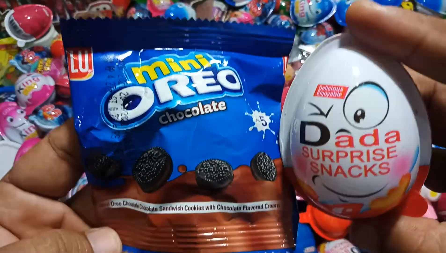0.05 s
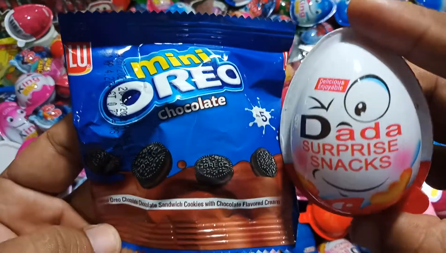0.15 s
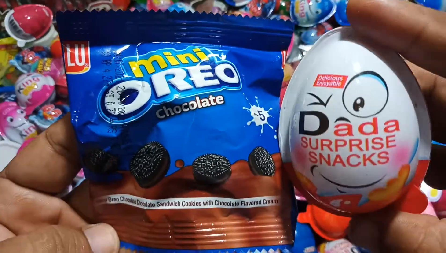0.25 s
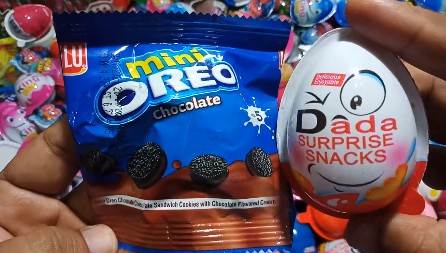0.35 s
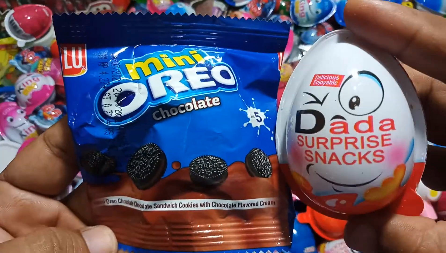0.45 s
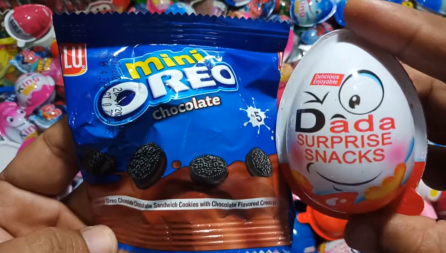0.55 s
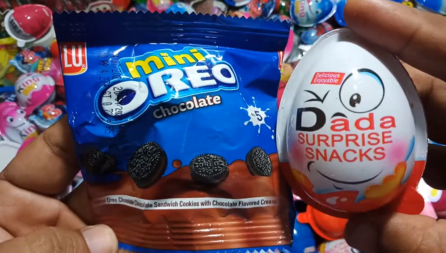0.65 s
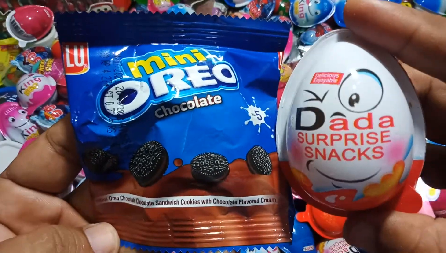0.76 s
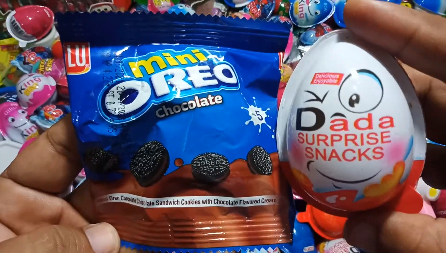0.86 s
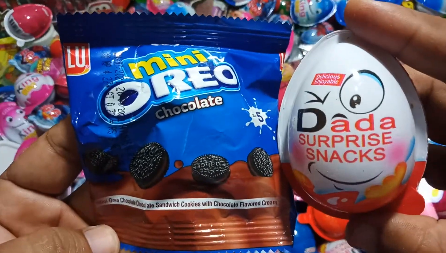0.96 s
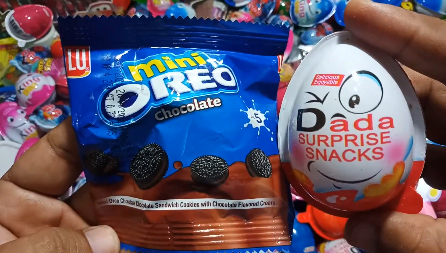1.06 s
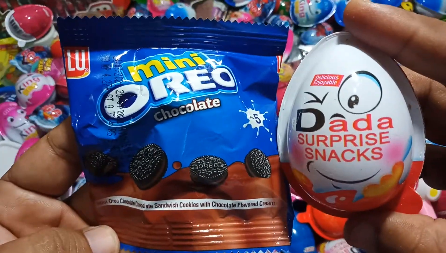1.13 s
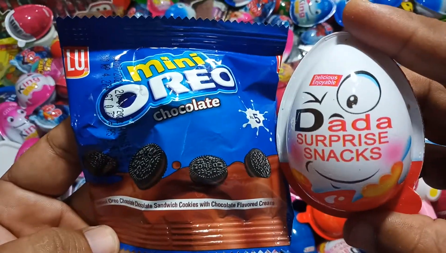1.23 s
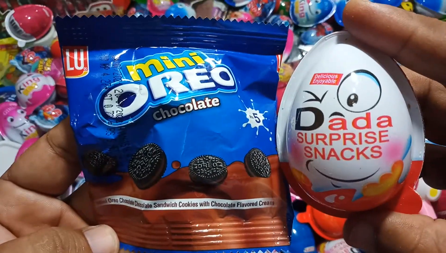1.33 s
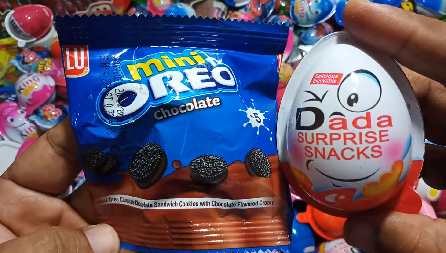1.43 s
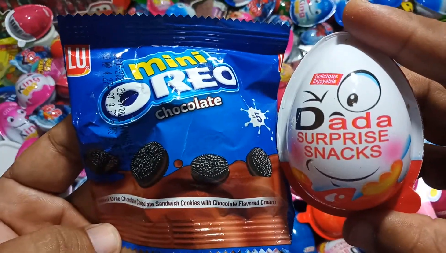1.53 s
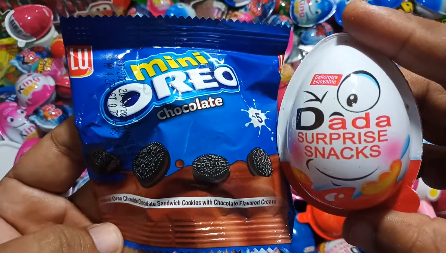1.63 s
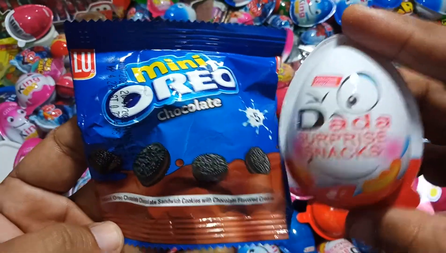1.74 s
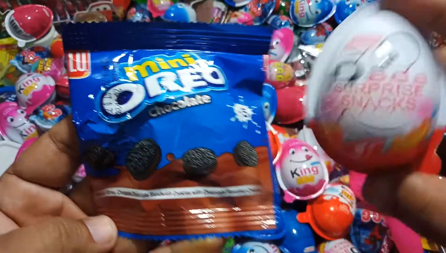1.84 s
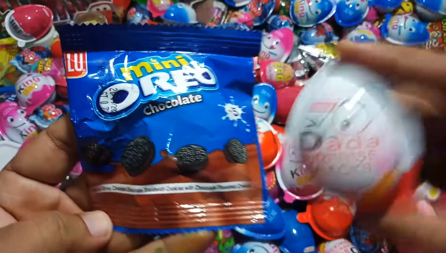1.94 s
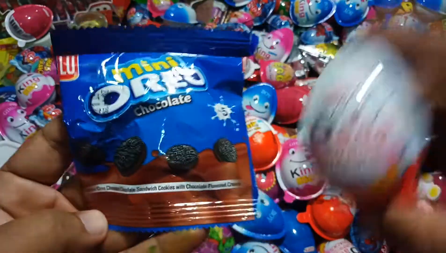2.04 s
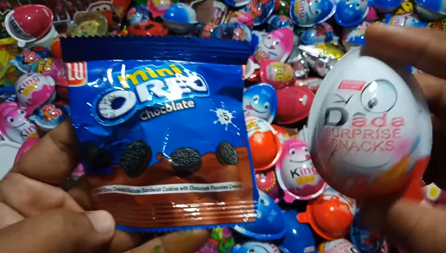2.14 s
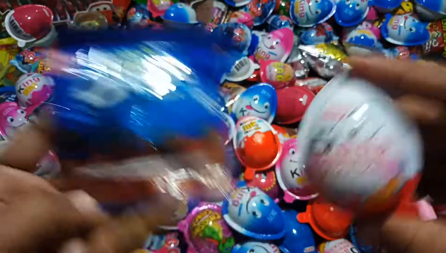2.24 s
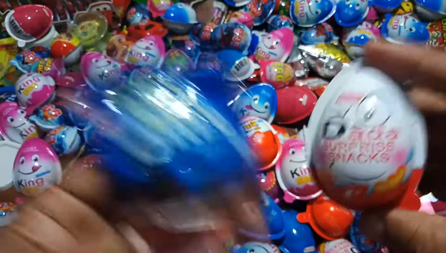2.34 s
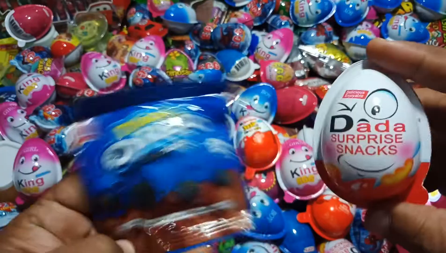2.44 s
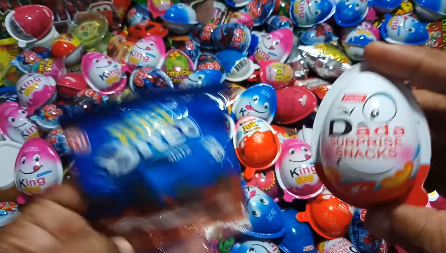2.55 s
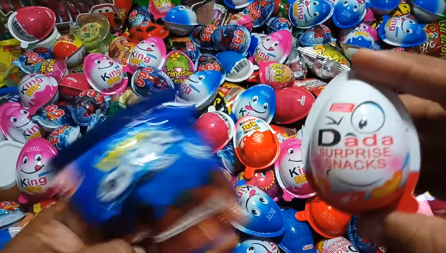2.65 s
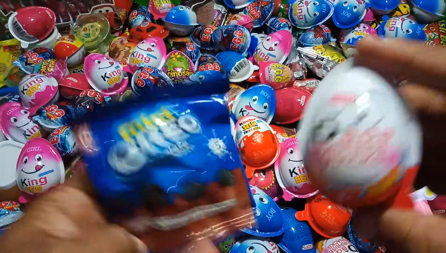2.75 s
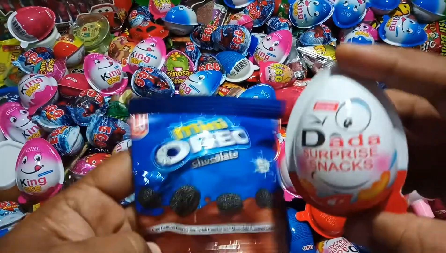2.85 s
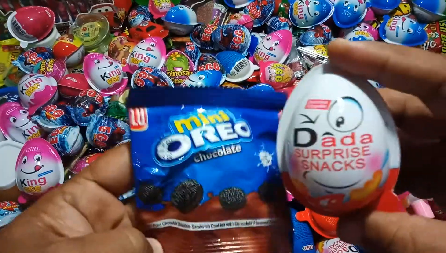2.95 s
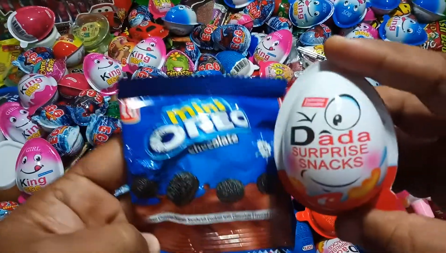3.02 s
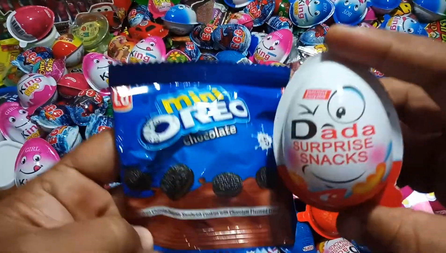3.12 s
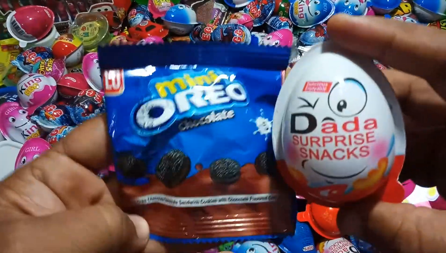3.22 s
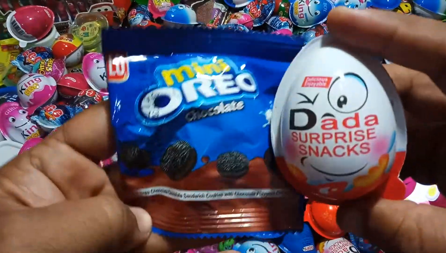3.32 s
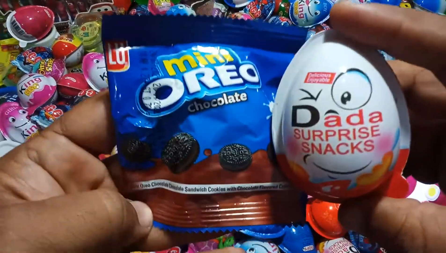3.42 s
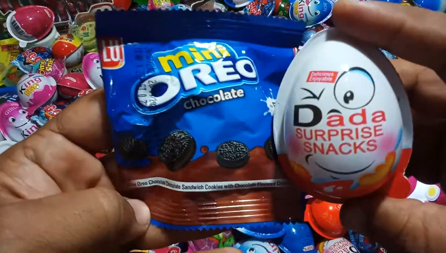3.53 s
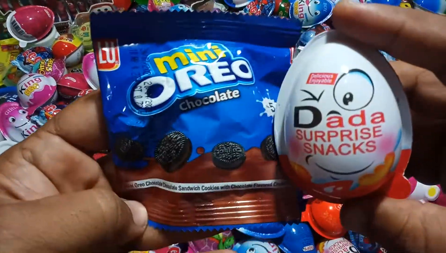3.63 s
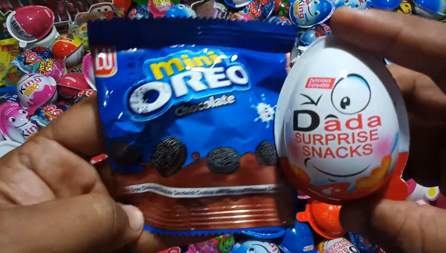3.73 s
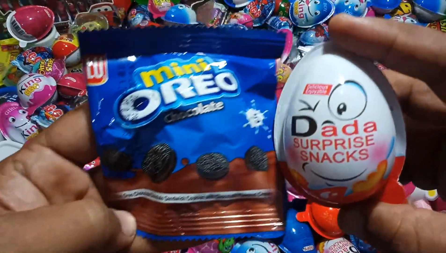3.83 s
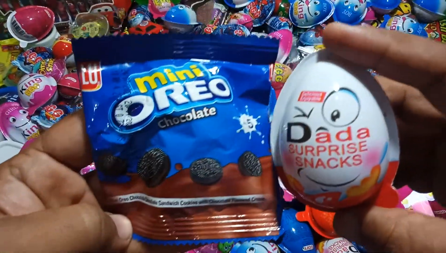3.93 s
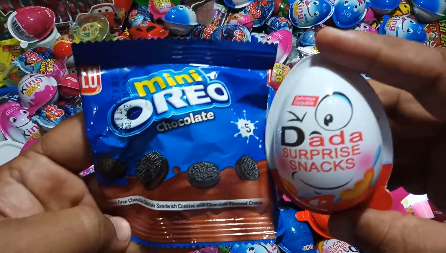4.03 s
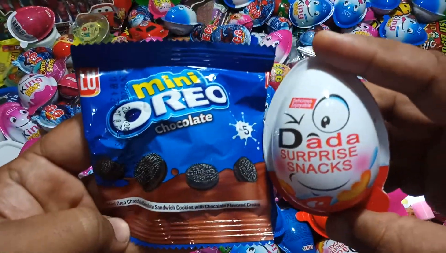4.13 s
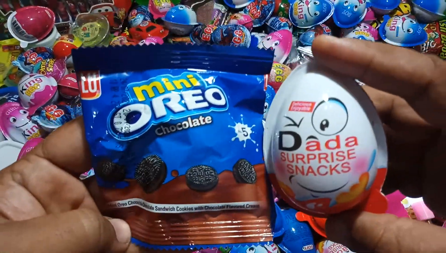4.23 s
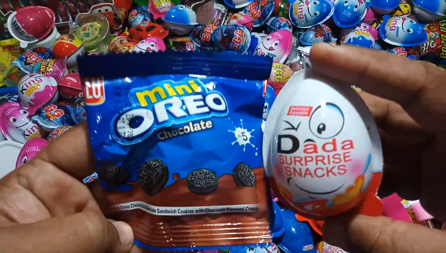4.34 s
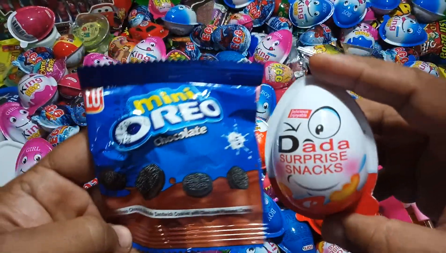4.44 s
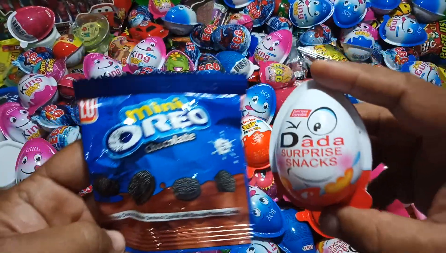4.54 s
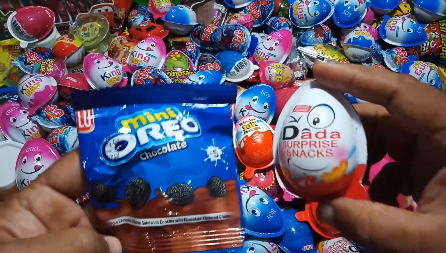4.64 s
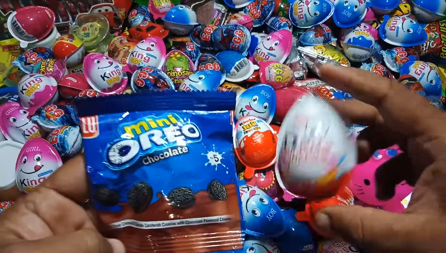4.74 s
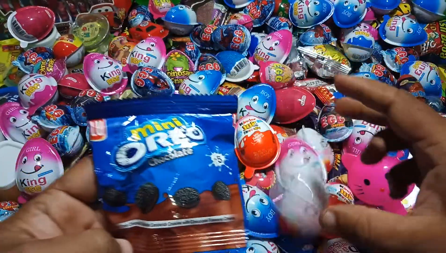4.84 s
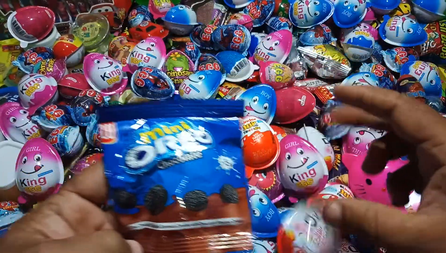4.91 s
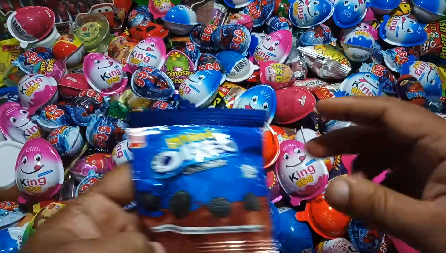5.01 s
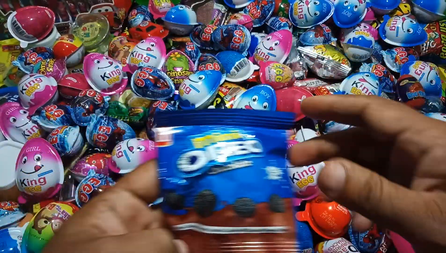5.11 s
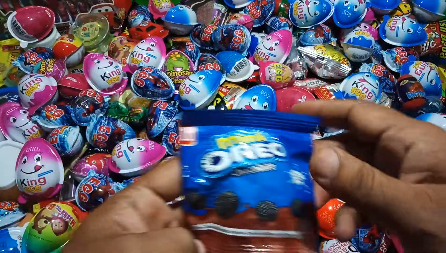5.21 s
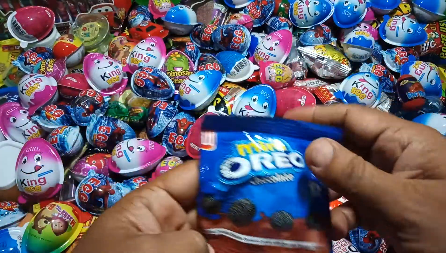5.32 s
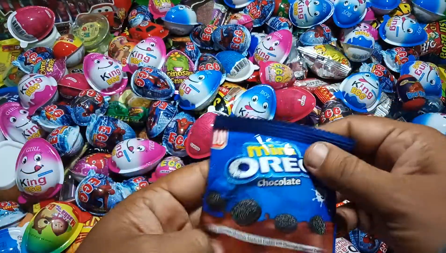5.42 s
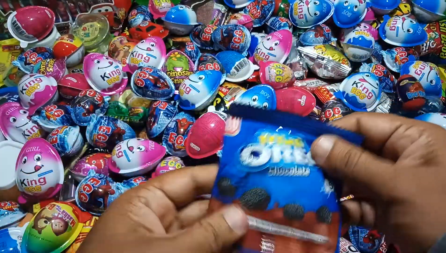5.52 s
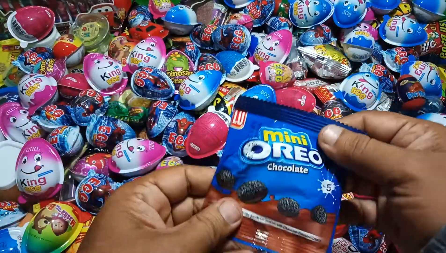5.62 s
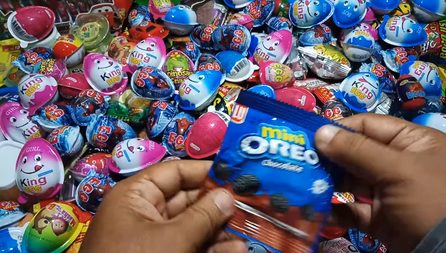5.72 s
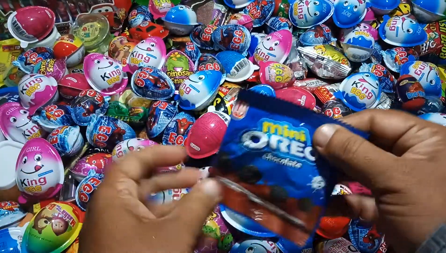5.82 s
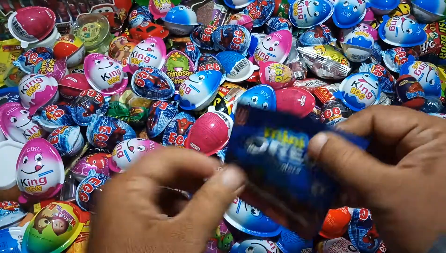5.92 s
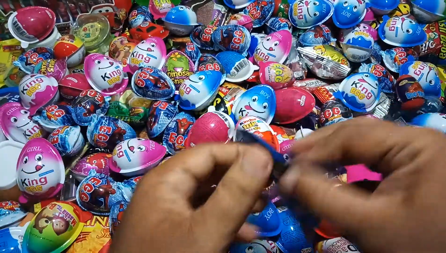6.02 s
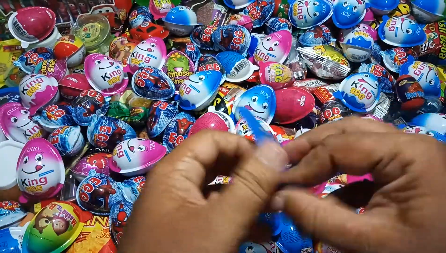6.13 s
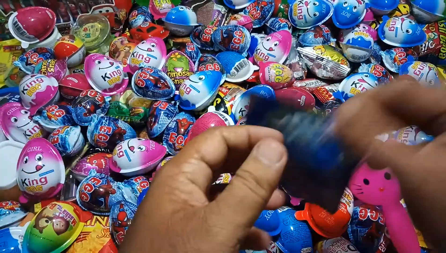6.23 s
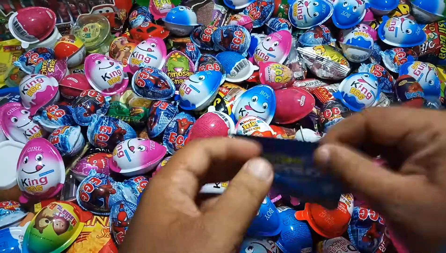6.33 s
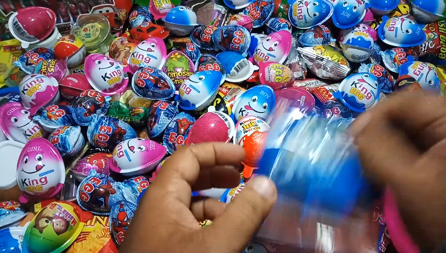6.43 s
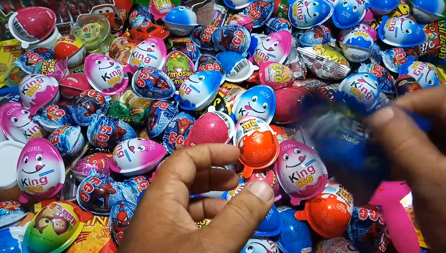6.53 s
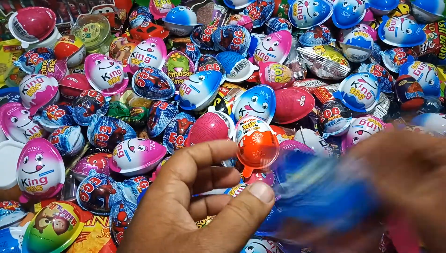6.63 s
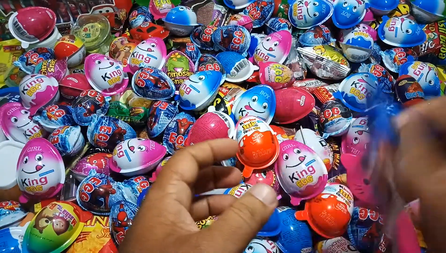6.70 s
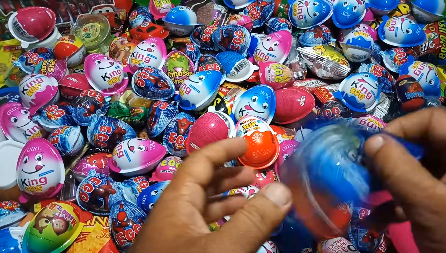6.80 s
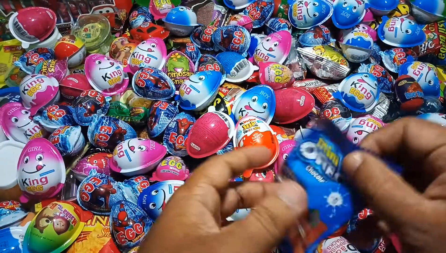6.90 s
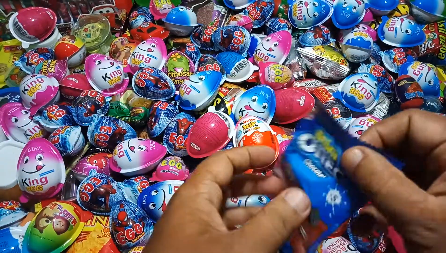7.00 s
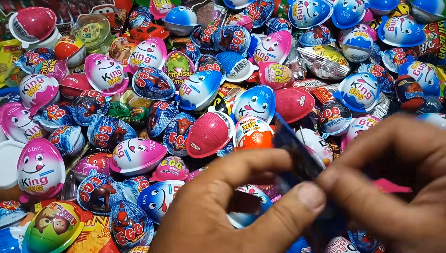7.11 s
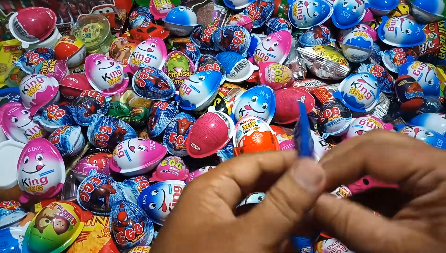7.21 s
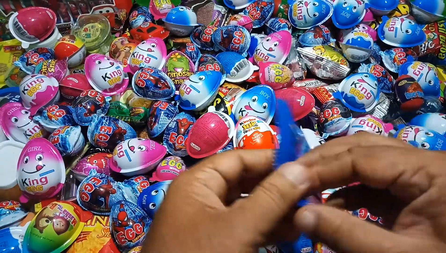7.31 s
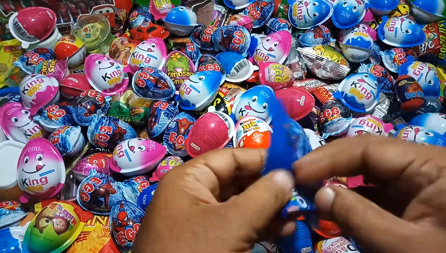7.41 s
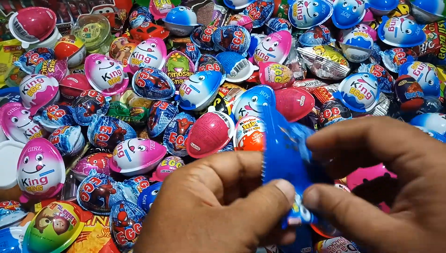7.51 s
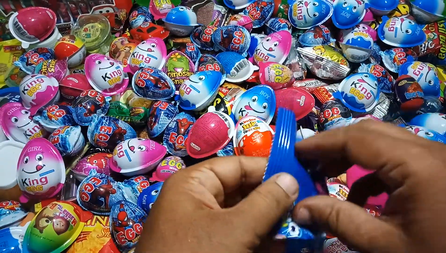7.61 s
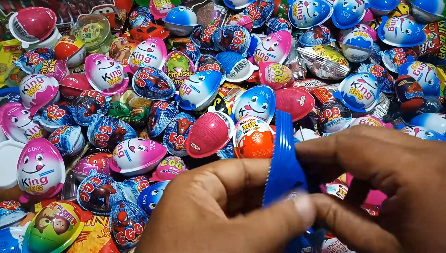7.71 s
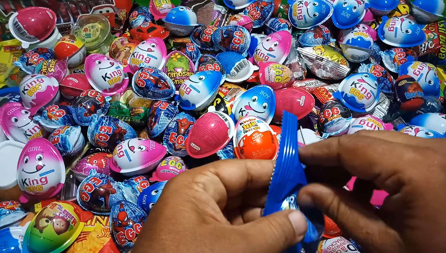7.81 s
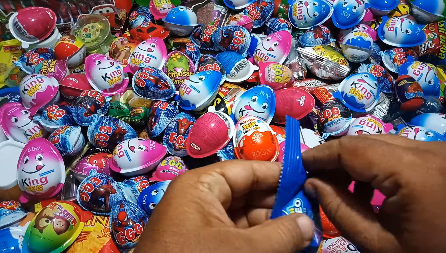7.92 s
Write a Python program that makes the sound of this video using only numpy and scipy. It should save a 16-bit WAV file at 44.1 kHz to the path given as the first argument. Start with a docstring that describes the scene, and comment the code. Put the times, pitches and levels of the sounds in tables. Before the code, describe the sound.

Over faint room hum, a light plastic shell taps and drops among others, followed by increasingly dense, bright crinkling of a small foil packet.

```python
"""Faint room air and a low hum are heard first and run throughout; over them the knocks of a plastic toy egg
and its heap alternate with the crackling of a small plastic snack packet, all close by in a small room.
Egg: damped shell modes struck by contacts. Heap: dense showers of small plastic flips.
Packet: film buckles in single snaps, in avalanches and in a fine crackle; biscuits ring the air inside.
Air, hum and sliding fingertips are filtered noise; the room adds scatter and a decaying tail."""
import sys
import numpy as np
from scipy import signal
from scipy.fft import rfft, irfft
from scipy.io import wavfile

SR = 44100
rng = np.random.default_rng(int(sys.argv[2]) if len(sys.argv) > 2 else 0)


def file_out(sig):
    """Save sig as 16-bit WAV at sys.argv[1]."""
    # one column per channel
    cols = np.atleast_2d(sig).T
    # limit, then scale
    lim = np.clip(cols, -1, 1)
    pcm = np.round(lim * 32767).astype(np.int16)
    wavfile.write(sys.argv[1], SR, pcm)


N = 351036
TIME = np.arange(N) / SR  # t/s

# Levels in the tables are relative; body/dB is the band below BODY_EDGE_HZ against the band above it.
BODY_EDGE_HZ = 1500
BASS_EDGE_HZ = 55  # the near sounds carry nothing lower
CUTOFF_HZ = 15900  # upper limit of the recorder

# Spectrum of the room air: f/Hz, level per hertz/dB
AIR_SPECTRUM = [(15, -69), (25, -46.5), (97, -1.5), (166, -13.5), (242, -9.5), (335, -13.5), (363, -14),
                (560, -18), (911, -18.5), (1100, -22.5), (1480, -23.5), (2990, -26), (4250, -37.5),
                (11900, -46.5), (16000, -43)]
AIR_DB = -63
# Bands of distant machinery: f/Hz, width/Hz, level/dB
HUM_BANDS = [(59.3, 6.6, -80.5), (84.4, 18, -74), (98.5, 18, -67), (255, 55, -76.5)]
# Reverberation of the room: f/Hz, time to fall by 60 dB/s
ROOM_DECAY = [(150, 0.64), (500, 0.36), (1400, 0.33), (4000, 0.35), (9000, 0.26), (15000, 0.26)]

# Fingertips slide on the film, swelling and fading: start t/s, length/s, level/dB
SLIDES = [(3.348, 0.17, -63), (3.516, 0.23, -65), (3.717, 0.14, -65), (3.953, 0.24, -75),
          (4.443, 0.081, -61)]
# Spectrum of skin on film: f/Hz, level per hertz/dB
SLIDE_SPECTRUM = [(300, -23), (1500, -0.5), (3000, 0), (4300, 1), (5600, -33), (9000, -33)]

# The dropped egg jostles its neighbours: start t/s, end t/s, level/dB, body/dB
HEAP_JOSTLES = [(4.924, 4.942, -29, 10), (4.947, 4.961, -31.5, -1), (4.963, 4.982, -37.5, 4.5),
                (5.114, 5.143, -35, 5), (5.213, 5.226, -32.5, -4)]
# The heap settles: t/s, level/dB, body/dB
HEAP_SETTLING = [(4.93, -41, 9), (5.0, -37.5, -5), (5.05, -49.5, 3.5), (5.13, -47, 4), (5.19, -48, 2.5),
                 (5.25, -53.5, -4), (5.3, -69, 8), (5.39, -64, -8)]
# Spectrum of the heap: f/Hz, level per hertz/dB
HEAP_SPECTRUM = [(30, -50), (140, -15), (330, -4), (480, -16.5), (650, -7.5), (850, -8.5), (1250, -3.5),
                 (1550, -2), (2000, -5.5), (3600, -5.5), (5500, -25), (8000, -45.5), (15000, -48)]

# Knocks of the egg shell, harder contacts being higher: t/s, peak level/dB, centre f/Hz
EGG_KNOCKS = [(0.57, -31.5, 2200), (0.75, -49.5, 3000), (1.356, -32.5, 1700), (1.803, -32, 1900),
              (1.853, -43, 1910), (1.875, -44, 1300), (2.013, -12.5, 1360), (2.024, -24.5, 1400),
              (2.04, -31.5, 1340), (2.094, -32, 1520), (2.17, -20.5, 1900), (2.188, -10.5, 1290),
              (2.318, -15, 2250), (2.327, -24, 1280), (2.338, -14.5, 1280), (3.904, -45.5, 942),
              (4.028, -53, 1900),  (4.514, -38.5, 1530), (4.777, -47.5, 820), (4.924, -18, 1470),
              (4.93, -11.5, 1300), (4.95, -16, 1350), (4.957, -12, 1300), (4.965, -22.5, 1300),
              (5.059, -25, 1270), (5.116, -19, 790), (5.125, -22.5, 600), (5.163, -29, 1330),
              (5.188, -26.5, 1320), (5.216, -30.5, 1440), (5.431, -29.5, 600)]
# Modes of the hand-damped shell: f/Hz, level/dB, time to fall by 60 dB/s
SHELL_MODES = [(480, -23.5, 0.013), (940, -4, 0.0048), (1300, 1, 0.0061), (2047, -2.5, 0.0055),
               (3170, -12, 0.0081), (4630, -14.5, 0.0064)]

# Biscuits shift in the air-filled pouch as it is lowered: t/s, level/dB
BISCUIT_BUMPS = [(2.35, -72), (2.4, -50), (2.5, -56), (2.56, -51), (2.65, -51), (2.75, -42), (2.86, -60),
                 (2.96, -63)]
# Spectrum of the air-filled pouch: f/Hz, level per hertz/dB
POUCH_SPECTRUM = [(50, -48), (130, -12.5), (200, 0), (290, 3.5), (450, -26), (1200, -40)]

# Spectrum of the film: f/Hz, level per hertz/dB
FILM_SPECTRUM = [(30, -48), (120, -14), (250, -8.5), (345, -3), (500, -10), (710, -2), (1100, -6.5),
                 (1500, -4.5), (2400, -3), (3450, 0), (4300, -5.5), (5200, -14), (7400, -26.5),
                 (12000, -37), (15000, -33)]
# Taut film cracks more brightly than slack film: t/s, treble level/dB
FILM_TAUTNESS = [(2.9, -4.5), (3.4, 4.5), (5.4, 2), (6.3, -1.5), (7.2, -1.5), (7.9, 5)]
# Finger presses keep the film crackling while the packet is lowered, passed to the other hand, turned,
# crushed into a new grip, searched for its seam and pulled at: start t/s, length/s, level/dB, body/dB
FINGER_PRESSES = [(2.343, 0.069, -38, -6), (2.422, 0.031, -31, -4), (2.521, 0.12, -37, -4),
                  (2.672, 0.13, -32.5, -9.5), (2.81, 0.12, -44.5, -3), (5.464, 0.13, -41, -3.5),
                  (5.586, 0.097, -38.5, -4), (5.732, 0.144, -48, 0), (6.069, 0.068, -34, -5.5),
                  (6.144, 0.19, -41.5, -8.5), (6.294, 0.22, -37, -3), (6.539, 0.18, -33, -6),
                  (6.696, 0.2, -25.5, -6.5), (6.902, 0.12, -35, -13), (7.081, 0.09, -45.5, -6.5),
                  (7.206, 0.17, -38, -7), (7.388, 0.16, -46, -9), (7.589, 0.13, -36.5, -4),
                  (7.743, 0.13, -41.5, -5), (7.907, 0.045, -39, -3)]
PRESS_ATTACK_S, PRESS_RELEASE_S = 0.0071, 0.015
PRESS_EASE_DB_PER_S = 0.5  # the film relaxes a little under a held press
# A fold gives way in an avalanche: start t/s, end t/s, level/dB, body/dB
FOLD_AVALANCHES = [(2.371, 2.41, -32.5, -5.5), (2.456, 2.481, -28, -5.5), (2.715, 2.738, -34, 1),
                   (2.783, 2.797, -28, -3.5), (2.865, 2.885, -35.5, -1.5), (3.463, 3.475, -48, 1.5),
                   (5.621, 5.682, -31.5, -3), (5.7, 5.714, -37, 0.5), (5.735, 5.75, -45, 6),
                   (5.85, 5.875, -45, 2.5), (6.305, 6.322, -32.5, -3.5), (6.347, 6.364, -31.5, -6.5),
                   (6.488, 6.51, -30.5, -6), (6.548, 6.57, -30.5, -3.5), (6.622, 6.646, -26.5, -6.5),
                   (6.7, 6.722, -22.5, -8.5), (6.756, 6.777, -18, -5.5), (6.838, 6.857, -26.5, 0),
                   (6.975, 6.987, -27, -5.5), (7.574, 7.586, -29, -7), (7.672, 7.688, -29, -5),
                   (7.896, 7.905, -28, -9.5)]
# Loud single snaps: t/s, peak level/dB, centre f/Hz of the facet that flips
LOUD_SNAPS = [(1.56, -34.5, 2530), (2.124, -29.5, 2800), (2.527, -23, 2010), (2.533, -20.5, 3130),
              (2.542, -24, 3400), (2.564, -18, 3700), (2.721, -13, 3470), (2.765, -18, 3570),
              (2.835, -18, 3570), (2.867, -13.5, 3450), (2.906, -22.5, 1550), (3.001, -34.5, 1020),
              (3.01, -37, 3500), (3.399, -34.5, 2010), (3.425, -26, 3450), (3.527, -24, 4060),
              (3.789, -40.5, 3050), (5.43, -25, 2940), (5.506, -23.5, 3380), (5.534, -16.5, 3650),
              (5.55, -17.5, 3800), (5.643, -13.5, 3360), (5.664, -13.5, 3400), (5.698, -14, 2940),
              (5.704, -17.5, 1630), (5.732, -29, 2440), (5.824, -17.5, 2300), (5.855, -14.5, 2560),
              (5.903, -31, 3660), (5.924, -27, 2250), (5.979, -41.5, 3680), (6.173, -22.5, 3640),
              (6.215, -26, 3480), (6.229, -20, 3370), (6.241, -20, 2240), (6.313, -15.5, 3220),
              (6.391, -13, 3520), (6.413, -18.5, 3870), (6.705, -3, 2560), (6.756, -3, 1490),
              (6.811, -17, 3450), (6.838, -13.5, 3320), (6.929, -10.5, 3270), (6.999, -17, 2920),
              (7.098, -24.5, 1636), (7.154, -25, 2270), (7.197, -16.5, 3770), (7.352, -17.5, 2200),
              (7.373, -24, 2080), (7.4, -15, 2670), (7.417, -18.5, 3540), (7.443, -14, 3440),
              (7.483, -16, 2230), (7.506, -15.5, 3530), (7.592, -11, 3700), (7.673, -11.5, 2460),
              (7.696, -10.5, 2240), (7.71, -11.5, 2330), (7.752, -26, 3850), (7.819, -17, 3740),
              (7.94, -14.5, 3540)]
# Sharp edge of a snap: level/dB of the softest fold, level/dB of the tightest crease
CRACK_RANGE = (-21, -0.5)
# Smaller facets flip at random: candidates per second, level above the press, range of sizes and of pitches
STRAY_PER_S, STRAY_DB, STRAY_SPREAD_DB, STRAY_HZ = 14, 8.5, 2, (1530, 3980)


def amp(db):
    """Definition of the decibel: level to amplitude gain."""
    return 10 ** (np.asarray(db) / 20)


def unit(x):
    """Normalisation of power: scales to rms 1."""
    return x / np.sqrt(np.mean(x ** 2) + 1e-20)


def read(points, hz):
    """Interpolation along a logarithmic frequency axis."""
    f, value = np.transpose(points)
    return np.interp(np.log(hz + 1), np.log(f + 1), value)


def add(mix, s, sound):
    """Superposition: adds a sound in place at time s."""
    part = mix[max(round(s * SR), 0):][:len(sound)]
    part += sound[:len(part)]


def ringing(spectrum, size=4096):
    """Minimum phase: the causal impulse response that has this spectrum."""
    hz = abs(np.fft.fftfreq(size, 1 / SR))
    log_gain = np.log(amp(read(spectrum, hz)))
    # the Hilbert transform of the log gain gives the phase
    response = np.exp(np.conj(signal.hilbert(log_gain)))
    return np.fft.ifft(response).real[:size // 2]


def colour(x, spectrum):
    """Linear filtering: a body with this spectrum responds to the excitation."""
    return signal.oaconvolve(x, ringing(spectrum))[:len(x)]


def noise_band(gain):
    """Stationary noise: white noise shaped by a gain over frequency, at rms 1."""
    return unit(irfft(rfft(rng.standard_normal(N)) * gain, N))


def background():
    """Filtered noise: room air drifts a little in level over narrow bands of wavering low hum."""
    hz = np.fft.rfftfreq(N, 1 / SR)
    drift = np.zeros(N)
    for rate_hz in np.geomspace(.4, 9, 14):
        drift += np.sin(2 * np.pi * (rate_hz * TIME + rng.random())) / np.sqrt(rate_hz)
    out = amp(AIR_DB + 0.24 * unit(drift)) * noise_band(amp(read(AIR_SPECTRUM, hz)))
    for centre, width, db in HUM_BANDS:
        out += amp(db - 1) * noise_band(np.exp(-(2 * (hz - centre) / width) ** 2))
    return out


def room(x, early_db, tail_db):
    """Reverberation: quick scatter from the hands and the heap, then the diffuse tail of a small room."""
    t = np.arange(SR // 2) / SR
    taps = rng.choice([-1., 1.], (2, len(t))) * (rng.random((2, len(t))) < 4000 / SR)
    early = taps[0] * (t > .0015) * np.exp(-t / 0.0028)
    # each frequency of the tail decays at its own rate
    hz, frame_s, z = signal.stft(taps[1] * (t > .007), SR, nperseg=256)
    decay = amp(-60 * frame_s / read(ROOM_DECAY, hz)[:, None])
    tail = signal.istft(z * decay, SR, nperseg=256)[1][:len(t)]
    echoes = amp(early_db) * early / np.linalg.norm(early)
    echoes += amp(tail_db) * tail / np.linalg.norm(tail)
    return x + signal.fftconvolve(x, echoes)[:N]


def fingers():
    """Sliding friction: skin slips over the film in random small impulses, a faint grainy hiss."""
    speed = np.zeros(N)
    for start, length, level_db in SLIDES:
        t = np.arange(0, length, 1 / SR)
        add(speed, start, amp(level_db + 1) * np.sin(np.pi * t / length))
    slips = rng.standard_normal(N) * (rng.random(N) < 900 / SR)
    return unit(colour(slips, SLIDE_SPECTRUM)) * speed


def facet(hz, ring_s, click, flutter, flutter_s, size=900):
    """Snap-through buckling: a patch flips with a click, two short-lived modes and a flutter of the sheet."""
    t = np.arange(size) / SR
    swell = t / ring_s * np.exp(-t / ring_s) * 2 / (ring_s * SR)
    phase, other_phase, interval, sharpness = rng.random(4)
    other_hz = hz * 2 ** (1.72 * (interval - .5))
    modes = np.cos(2 * np.pi * (hz * t + phase))
    modes += 0.68 * np.cos(2 * np.pi * (other_hz * t + other_phase))
    sheet = flutter * rng.standard_normal(size) * np.exp(-t / flutter_s) * (1 - np.exp(-t / 0.0006))
    sheet[0] += click
    # tight creases crack brightly, soft folds only pop
    brightness = amp(14.3 * (sharpness - 0.5541))
    return (swell * modes + brightness * sheet) * rng.choice([-1, 1])


def grains(per_s, spread_db, spectrum, count=48):
    """Random point process: a steady stream of facet flips, most small and a few large."""
    size_db = spread_db * np.minimum(rng.exponential(1, N), 3.4)
    clicks = amp(size_db) * (rng.random(N) < per_s / SR) * rng.choice([-1, 1], N)
    which = rng.integers(0, count, N)
    out = np.zeros(N)
    for k, hz in enumerate(np.linspace(500, 7000, count)):
        flip = facet(hz, 0.00045, 0.26, 0.046, 0.0029)
        out += signal.oaconvolve(clicks * (which == k), flip)[:N]
    return colour(out, spectrum)


def driven(stream, effort, span_s):
    """Energy release: effort sets the grains' power over each short span, in the upper band and the body."""
    lowpass = signal.butter(3, BODY_EDGE_HZ, fs=SR, output="sos")
    low = signal.sosfiltfilt(lowpass, stream)
    window = signal.windows.hann(int(span_s * SR))
    out = np.zeros(N)
    for band, gain in zip((stream - low, low), effort):
        power = signal.oaconvolve(band ** 2, window, "same") * 2 / (span_s * SR)
        floor = 0.022 * np.mean(band ** 2)
        out += gain * band / np.sqrt(abs(power) + floor)
    return out


def strokes(curves):
    """Slow forcing: upper-band and body gains along gradual movements."""
    effort = np.zeros((2, N))
    for curve in curves:
        s, level_db, body_db = np.transpose(curve)
        for gain, db in zip(effort, (level_db, level_db + body_db)):
            gain += amp(np.interp(TIME, s, db, left=-200, right=-200))
    return effort


def bursts(rows, fade_s):
    """Impulsive forcing: upper-band and body gains of avalanches that start at once and die quickly."""
    effort = np.zeros((2, N))
    for start, end, level_db, body_db in rows:
        t = np.arange(start, end + 8 * fade_s, 1 / SR)
        shape = np.minimum((t - start) / 0.00039, 1) * np.exp(-np.maximum(t - end, 0) / fade_s)
        add(effort[0], start, amp(level_db) * shape)
        add(effort[1], start, amp(level_db + body_db) * shape)
    return effort


def heap():
    """Multiple impact and friction: the dropped egg bounces among the others, which scrape and settle."""
    jostle = driven(grains(1200, 5.8, HEAP_SPECTRUM), bursts(HEAP_JOSTLES, 0.0017), 0.022)
    settle = driven(grains(1500, 4.8, HEAP_SPECTRUM), strokes([HEAP_SETTLING]), 0.065)
    return amp(-4.5) * jostle + amp(-2) * settle


def egg():
    """Damped modal vibration: a knock rings the held shell briefly, favouring modes near the contact's pitch."""
    out, t = np.zeros(N), np.arange(2048) / SR
    hz, db, t60 = np.transpose(SHELL_MODES)[:, :, None]
    small_body = signal.butter(2, 260, "highpass", fs=SR)  # so small a shell radiates little bass
    detunes = rng.standard_normal((len(EGG_KNOCKS), len(SHELL_MODES), 1))
    for (s, peak_db, centre_hz), detune in zip(EGG_KNOCKS, detunes):
        weight_db = db - 6 * abs(np.log2(hz / centre_hz))
        mode_hz = hz * np.exp(0.038 * detune)
        modes = amp(weight_db - 60 * t / t60) * np.sin(2 * np.pi * mode_hz * t)
        onset = 1 - np.exp(-t / 0.001)
        buzz = colour(rng.standard_normal(len(t)) * np.exp(-t / 0.0022), HEAP_SPECTRUM)
        knock = signal.lfilter(*small_body, modes.sum(0) * onset + 0.42 * buzz)
        add(out, s + 0.00095, amp(peak_db) * knock / abs(knock).max())
    return out


def biscuits():
    """Cavity resonance: soft, irregular bumps inside the packet ring its air pocket."""
    s, level_db = np.transpose(BISCUIT_BUMPS)
    bumps = rng.standard_normal(N) * (rng.random(N) < 70 / SR)
    gain = amp(np.interp(TIME, s, level_db, left=-200, right=-200))
    return unit(colour(bumps, POUCH_SPECTRUM)) * gain


def presses():
    """Loading and relaxation: each finger press takes hold, eases a little and lets go, in two band gains."""
    power = np.zeros((2, N))
    for start, length, level_db, body_db in FINGER_PRESSES:
        t = np.arange(0, length + 8 * PRESS_RELEASE_S, 1 / SR)
        release = np.exp(-np.maximum(t - length, 0) / PRESS_RELEASE_S)
        shape = np.minimum(t / PRESS_ATTACK_S, 1) * release
        gain = shape * amp(level_db - PRESS_EASE_DB_PER_S * t)
        # overlapping presses add in power
        add(power[0], start, gain ** 2)
        add(power[1], start, (gain * amp(body_db)) ** 2)
    return np.sqrt(power)


def crinkle():
    """Crackling noise: fine crackle under moving fingers, and dense avalanches where a fold gives way."""
    fine = driven(grains(520, 4.8, FILM_SPECTRUM), presses(), 0.059)
    folds = driven(grains(1100, 3.9, FILM_SPECTRUM), bursts(FOLD_AVALANCHES, 0.00076), 0.027)
    return amp(-1.0) * fine + amp(-1.5) * folds


def stray_snaps(count=500):
    """Random buckling: rows t/s, level/dB, f/Hz of small snaps whose size follows the finger press."""
    when, luck, size, pitch = rng.random((count, 4)).T
    s = when * N / SR
    press_db = 20 * np.log10(np.interp(s, TIME, presses()[0]) + 1e-9)
    peak_db = press_db + STRAY_DB + STRAY_SPREAD_DB * (size - .5)
    rows = np.transpose([s, peak_db, np.interp(pitch, [0, 1], STRAY_HZ)])
    chosen = luck < STRAY_PER_S * N / SR / count
    return rows[chosen & (press_db > -60)]


def snaps(rows):
    """Triggered buckling: a crease creeps, a large facet flips with a crack and sets off two smaller ones."""
    out, film = np.zeros(N), ringing(FILM_SPECTRUM)
    for (s, peak_db, hz), chance in zip(rows, rng.random((len(rows), 3))):
        flips = np.zeros(2048)
        delays = np.cumsum([0, .0012, .0005 + .001 * chance[0], 0.000998 + 0.0036 * chance[1]])
        for delay, size in zip(delays, (0.47, 1.0, 0.33, 0.28)):
            facet_hz = hz * np.exp(0.1 * rng.standard_normal())
            add(flips, delay, size * facet(facet_hz, 0.00047, 0.25, 0.036, 0.0014))
        crack = amp([np.interp(chance[2], [0, 1], CRACK_RANGE)])  # one sample, at the large flip
        add(flips, delays[1], crack)
        snap = signal.fftconvolve(flips, film)
        add(out, s + .0008, amp(peak_db - 2.0) * snap / abs(snap).max())
    return out


def stretched(x):
    """Tension of a membrane: taut film lifts the treble of every crack and slack film dulls it."""
    highpass = signal.butter(2, 5600, "highpass", fs=SR, output="sos")
    treble = signal.sosfiltfilt(highpass, x)
    treble_gain = amp(np.interp(TIME, *np.transpose(FILM_TAUTNESS)))
    return x + treble * (treble_gain - 1)


def scene():
    """Superposition of sources: packet, egg, heap and fingers sound in the room over its background."""
    film = stretched(crinkle() + snaps(LOUD_SNAPS) + snaps(stray_snaps()))
    near = fingers() + heap() + egg() + biscuits() + film
    highpass = signal.butter(3, BASS_EDGE_HZ, "highpass", fs=SR, output="sos")
    near = signal.sosfilt(highpass, near)
    return (background() + room(near, early_db=-10.5, tail_db=-14.5))[None]


def record(dry):
    """Band limitation: a linear-phase lowpass sets the recorder's upper limit."""
    lowpass = signal.firwin(511, CUTOFF_HZ, window=("kaiser", 9), fs=SR)
    return signal.oaconvolve(dry, lowpass[None], "same")


dry = scene()
out = record(dry)
file_out(out)
```